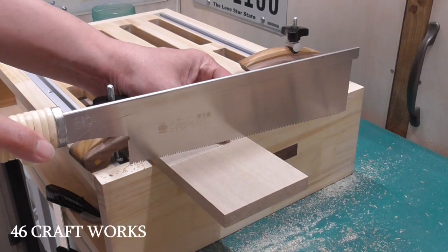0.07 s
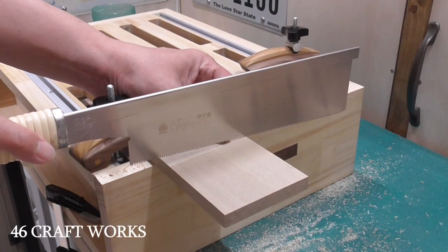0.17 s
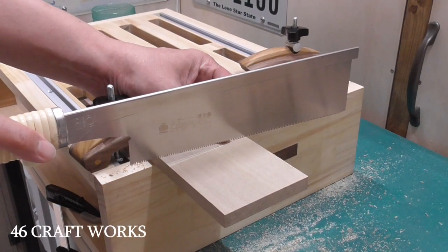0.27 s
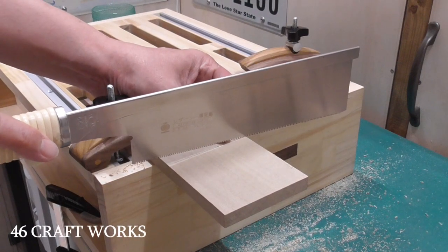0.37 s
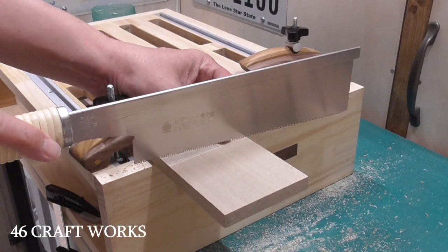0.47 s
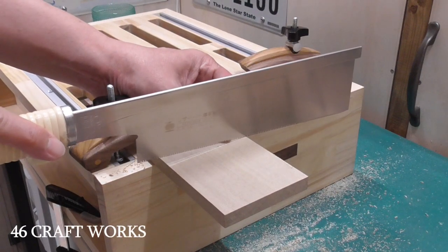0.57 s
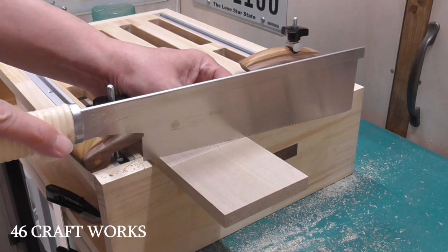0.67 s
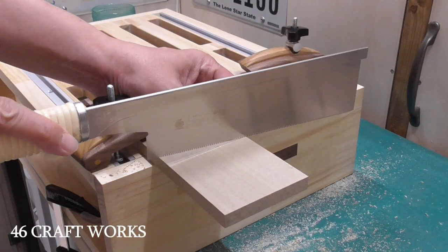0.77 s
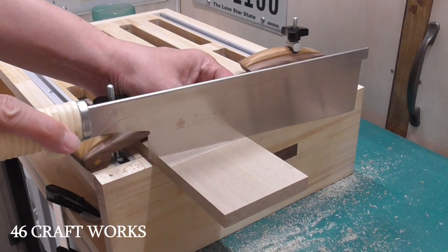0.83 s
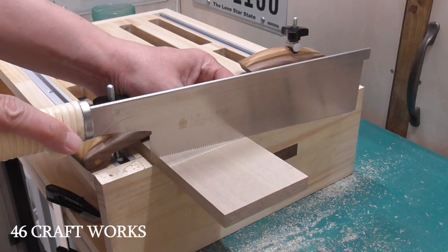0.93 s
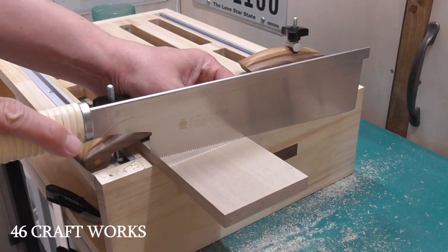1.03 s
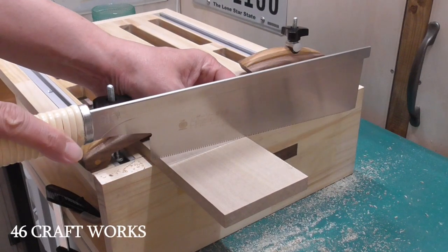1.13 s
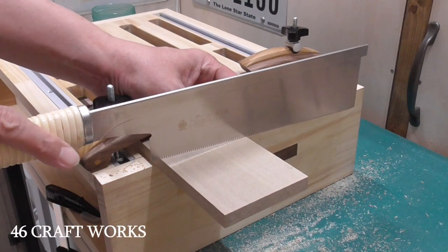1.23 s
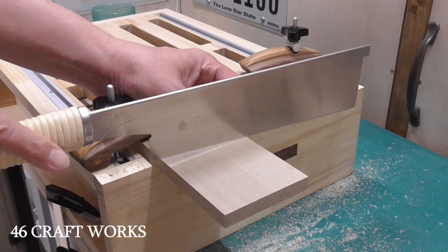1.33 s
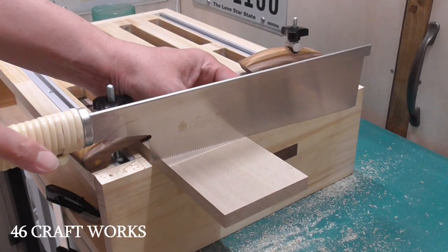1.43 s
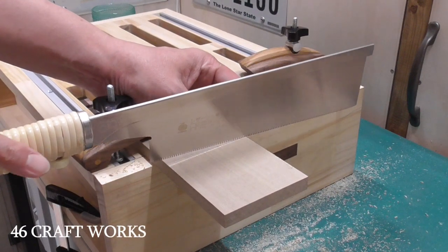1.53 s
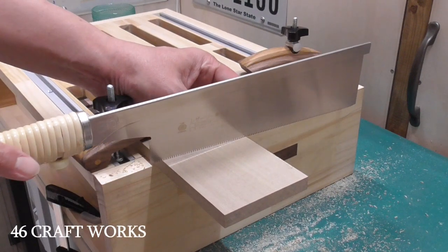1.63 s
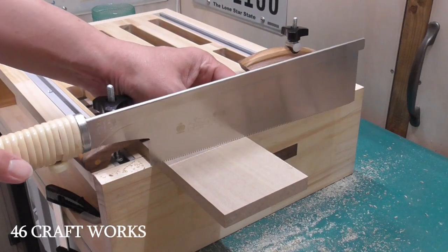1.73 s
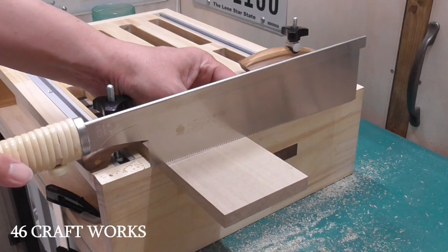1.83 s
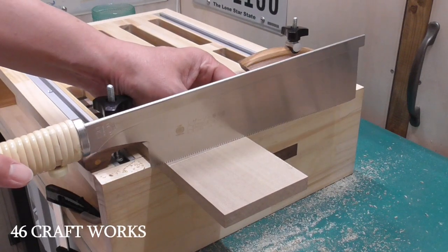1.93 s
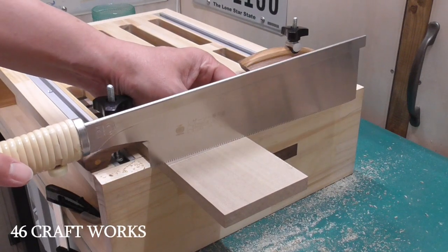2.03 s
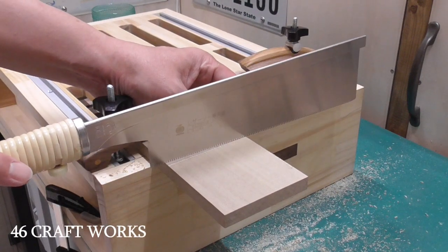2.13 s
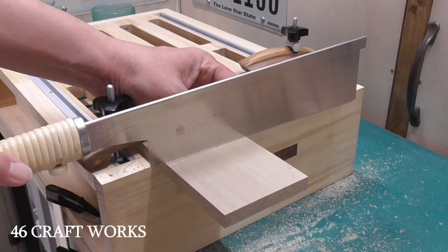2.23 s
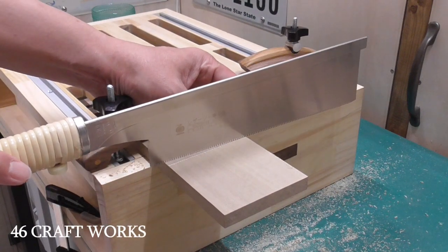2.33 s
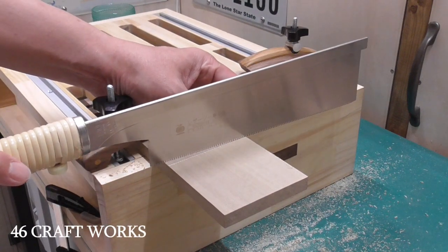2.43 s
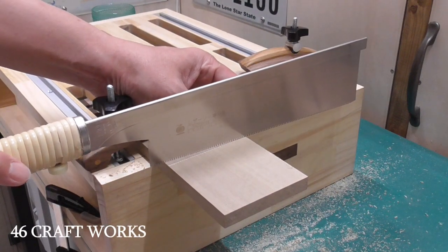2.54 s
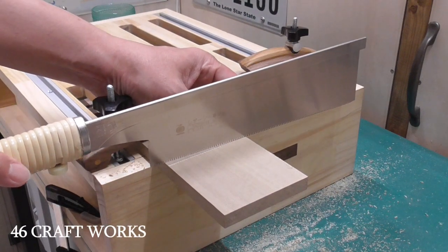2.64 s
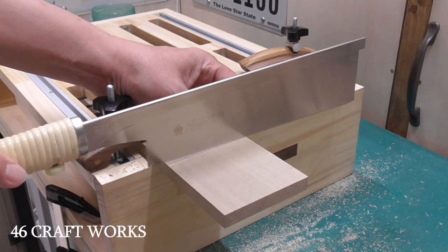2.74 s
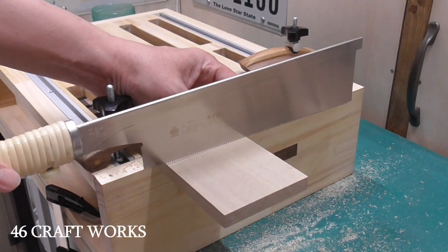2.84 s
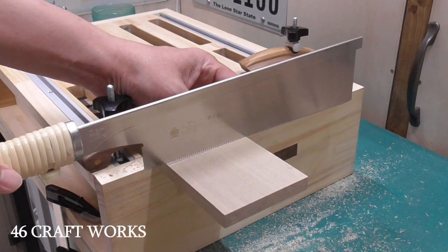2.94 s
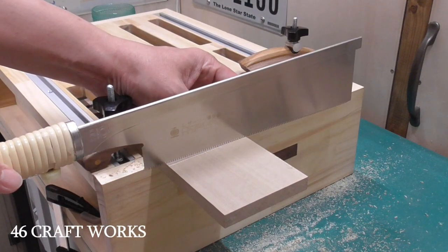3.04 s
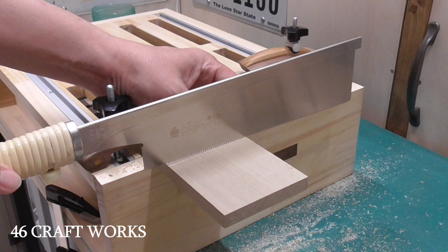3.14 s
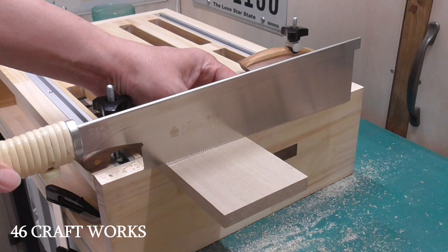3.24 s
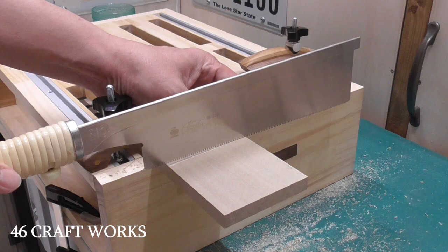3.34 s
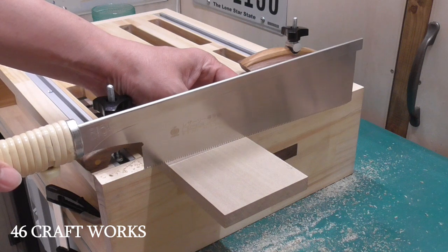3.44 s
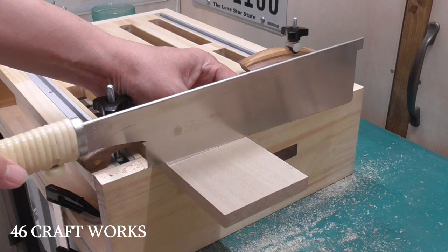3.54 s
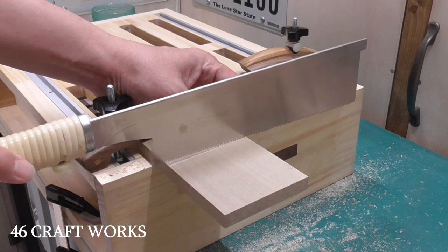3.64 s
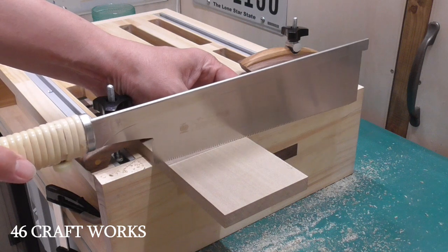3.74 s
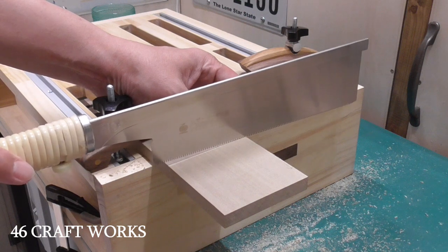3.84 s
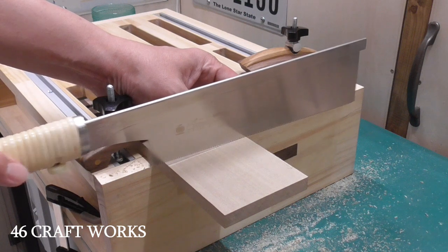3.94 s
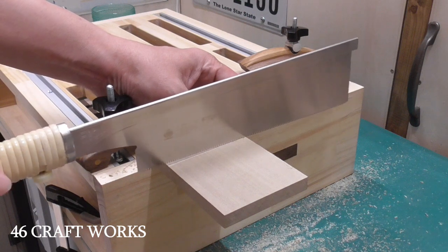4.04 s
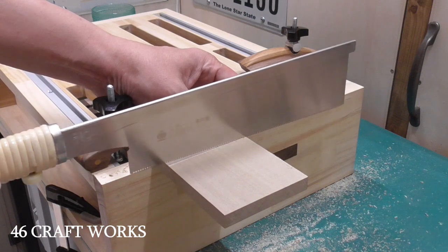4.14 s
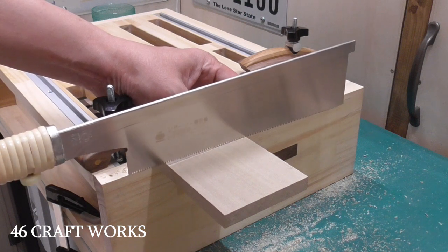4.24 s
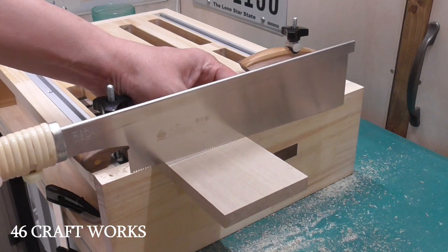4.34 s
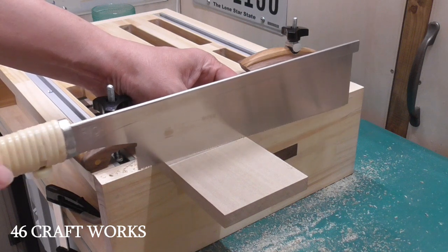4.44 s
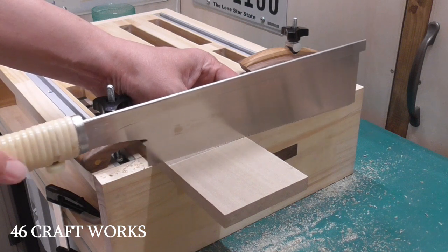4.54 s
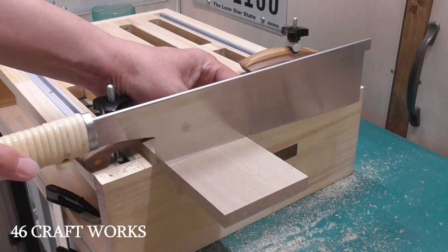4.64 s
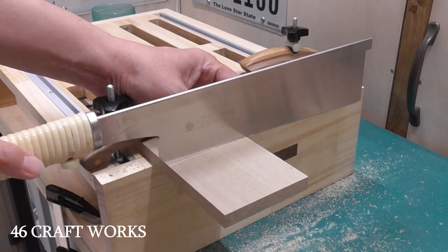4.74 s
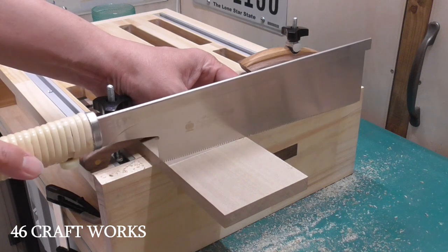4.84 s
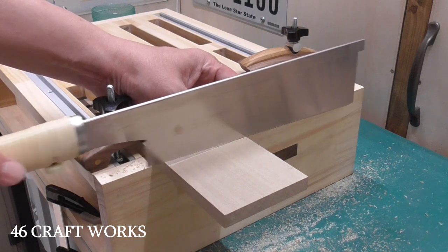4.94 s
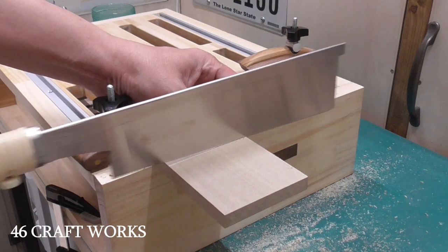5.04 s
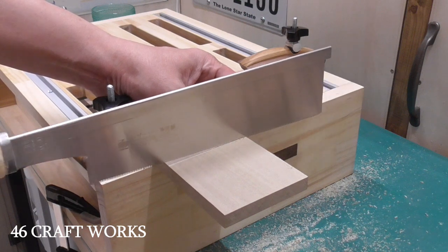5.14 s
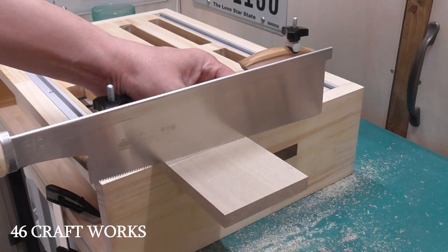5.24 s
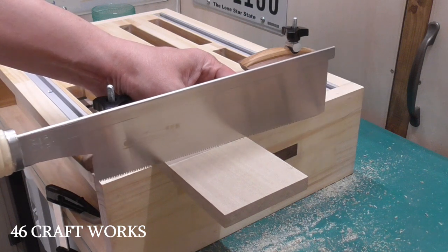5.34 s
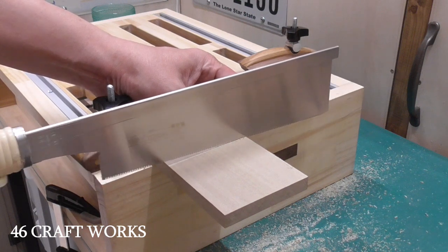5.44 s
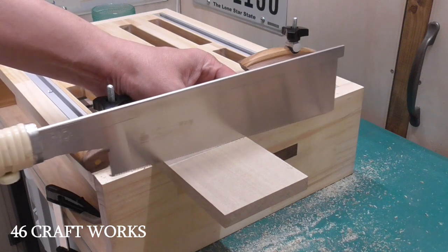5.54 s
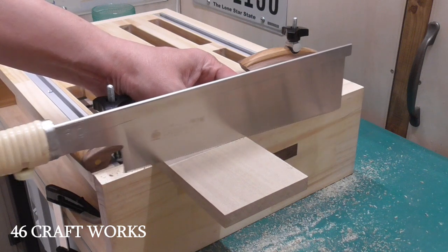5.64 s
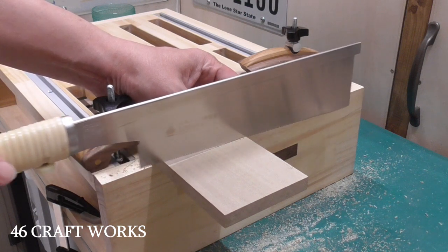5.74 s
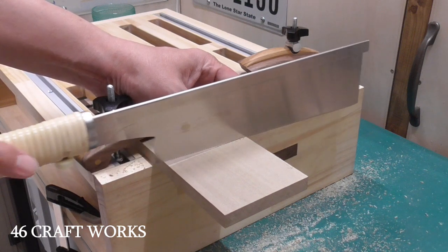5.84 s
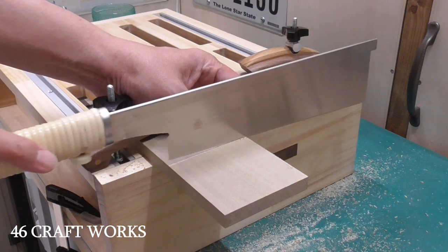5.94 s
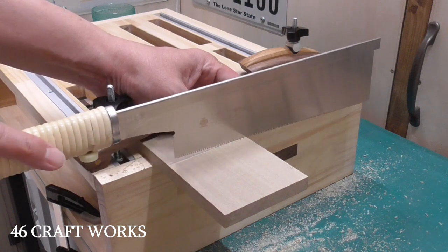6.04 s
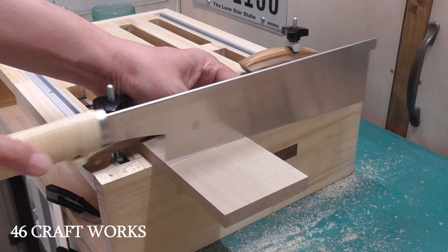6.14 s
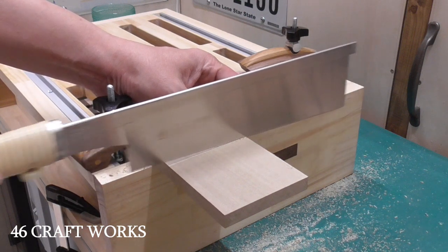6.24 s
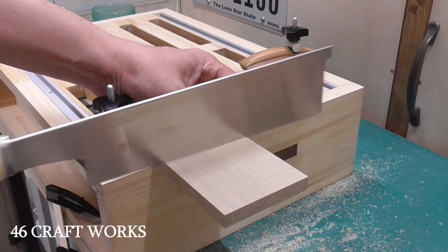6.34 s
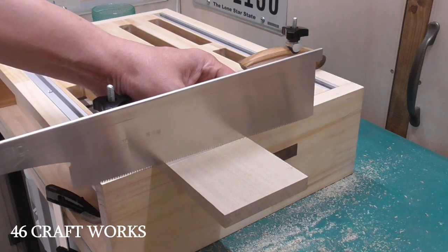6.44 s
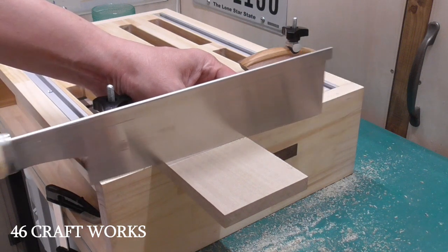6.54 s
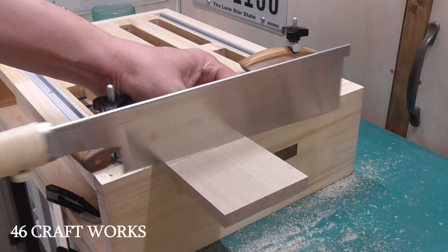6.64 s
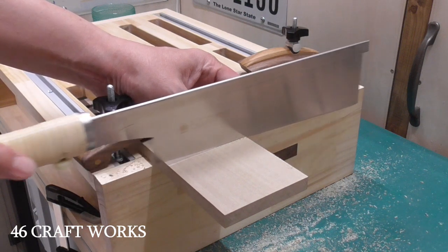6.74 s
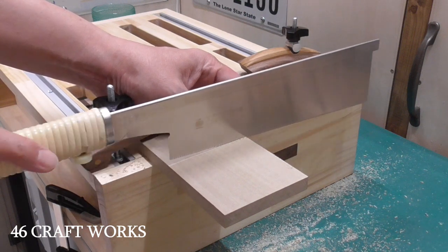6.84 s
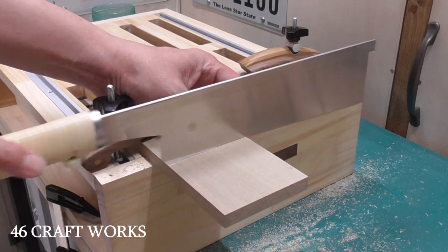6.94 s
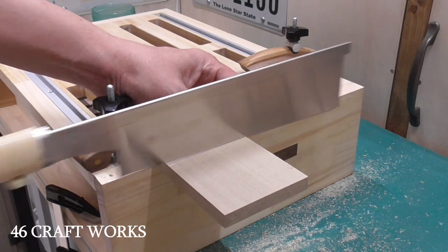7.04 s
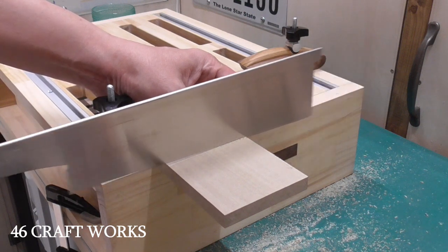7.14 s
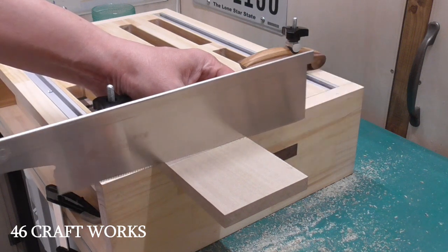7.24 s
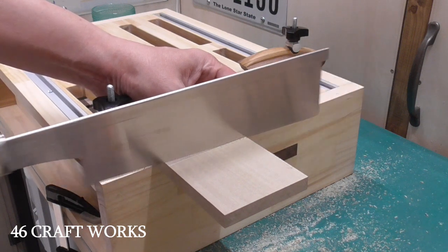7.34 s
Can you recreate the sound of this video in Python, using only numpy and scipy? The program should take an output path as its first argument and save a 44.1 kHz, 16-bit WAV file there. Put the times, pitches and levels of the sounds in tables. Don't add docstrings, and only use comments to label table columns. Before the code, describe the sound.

Heard close in stereo in a small, dry workshop, a thin pull saw catches tooth by tooth on a clamped board, with small crackling clicks. It rests for nearly two seconds amid faint skin rubs, tiny squeaks and knocks. Short tentative strokes follow, then longer, louder rasps with bright fibre hiss, steely blade ring and hollow booms from the wooden jig.

```python
import sys
import numpy as np
from scipy import signal
from scipy.fft import rfft, irfft, next_fast_len
from scipy.io import wavfile
from scipy.ndimage import uniform_filter1d

SR = 44100
rng = np.random.default_rng(int(sys.argv[2]) if len(sys.argv) > 2 else 0)


def persist_wave(psi):
    counts = np.round(np.clip(psi, -1, 1) * 32767).astype(np.int16)
    wavfile.write(sys.argv[1], SR, np.atleast_2d(counts).T)


def rack_gain(trim_db):
    fader = np.asarray(trim_db, float)
    return 10 ** (fader / 20)


N = 326340
HZ = np.fft.rfftfreq(next_fast_len(N + SR // 2), 1 / SR)

# (frequency [Hz], width [Hz], level on the pull [dB], level on the push [dB])
BOX_MODES = [(85.7, 37, -8.5, -19.5), (100, 42, -5.5, -10), (179.6, 13.7, 1.5, 3), (226, 40.8, -3.5, -1),
             (278, 29, -5, -7), (312, 41.6, -6, -7)]
# (start [s], length [s], fastest at [share 0-1], speed [dB], weight on the jig [dB])
PULL_STROKES = [
    (2.759, 0.16, 0.39, -46.5, 13),
    (3.966, 0.26, 0.26, -39.5, 10.5),
    (4.11, .19, 0.65, -48, 10.5),
    (4.901, .37, 0.5, -36.5, 13),
    (6.13, .385, 0.51, -34.5, 10),
    (6.939, 0.37, 0.41, -36, 7.5),
    (7.076, 0.23, 0.43, -39, -16),
]


def evened(x):
    return x / np.sqrt(np.mean(x ** 2) + 1e-20)


def read_spectrum(points, hz):
    f, value = np.transpose(points)
    return np.interp(np.log(hz + 1), np.log(f + 1), value)


def through(x, response):
    size = 2 * len(HZ) - 2
    gain = response / np.sqrt(np.mean(abs(response) ** 2))
    return irfft(rfft(x, size) * gain, size)[..., :N]


def wander(hz):
    slow = rfft(rng.standard_normal(N)) / (1 + (np.fft.rfftfreq(N, 1 / SR) / hz) ** 4)
    return evened(irfft(slow, N))


def body(modes, column, between_db, low_hz, high_hz):
    peaks = 0
    for k, mode in enumerate(modes):
        f, width = mode[:2]
        resonance = 1j * width * HZ / (f ** 2 - HZ ** 2 + 1j * width * HZ)
        peaks = peaks + (-1) ** k * rack_gain(mode[column]) * resonance
    low, high = 1j * HZ / low_hz, 1j * HZ / high_hz
    high_pass = (low ** 2 / (1 + 1.2 * low + low ** 2)) ** 2
    low_pass = 1 / (1 + 1.2 * high + high ** 2) ** 2
    return (peaks + rack_gain(between_db)) * high_pass * low_pass


def air():
    # (frequency [Hz], level [dB per Hz])
    tone = [(15, -44), (25, -20), (75, 0), (274, 3), (458, -0.5), (524, -1.5), (616, -1), (806, -7.5),
            (1080, -2.5), (1760, -15.5), (4280, -17.5), (6070, -15.5), (8380, -16), (12900, -18.5),
            (15600, -18)]
    # (frequency [Hz], left-right likeness [share])
    likeness = [(60, 1), (180, 0.037), (550, 0.024), (1650, 0.073), (4970, 0.2), (15000, 0.054)]
    frames, hz = N // 256 + 5, np.fft.rfftfreq(1024, 1 / SR)
    a, b, c, d, patches = rng.standard_normal((frames, 513, 5)).T
    patches = evened(uniform_filter1d(uniform_filter1d(patches, 14, 0), 10, 1))
    same = np.clip(read_spectrum(likeness, hz), -1, 1)[:, None]
    left = a + 1j * b
    right = same * left + np.sqrt(1 - same ** 2) * (c + 1j * d)
    level = rack_gain(read_spectrum(tone, hz)[:, None] + 1.4 * patches)
    sound = signal.istft(np.array([left, right]) * level, nperseg=1024, noverlap=768)[1]
    return rack_gain(-59.5) * evened(sound[:, :N])


def saw():
    # (frequency [Hz], width [Hz], level on the pull [dB], level on the push [dB])
    board_modes = [(362, 25, -4.5, 2), (453, 32, 6, 9.5), (602, 39.5, -0.5, 4.5), (699, 48, 1, 5.5),
                   (849, 32.3, 1.5, 2), (932.6, 24.5, 5, 5.5), (995.5, 18, 1.5, 4.5), (1070, 56, -1, 1),
                   (1140, 43, -44, -4), (1314, 148, -5, -8), (1272, 54, 0.5, -2), (1390, 57, -4.5, -5)]
    # (frequency [Hz], width [Hz], level on the pull [dB], on the push [dB], creeping [dB])
    blade_modes = [(2215, 200, 2, 6, 0), (2475, 44, 12, 13, 14), (2610, 85, -1, 7, 4),
                   (2815, 65, 13.5, 13, 5), (3230, 186, 6.5, 11.5, 10), (3420, 28, 11.5, 1.5, -6),
                   (3631, 31, -1, 8, -6), (4020, 60, 5, -13, 1), (4400, 85, -9, 4, 2),
                   (4746, 75, 9.5, 13.5, 15), (4882, 124, 7.5, 10.5, 14), (5190, 34, -3, 15, 8)]
    floor_db = [-20.5, -14.5, 2]
    # (lower edge [Hz], upper edge [Hz])
    band_edges = [(55, 396), (330, 1610), (1750, 5900)]
    # (frequency [Hz], level [dB per Hz])
    pull_hiss = [(3290, -17), (5600, 0.5), (5840, -13), (6390, -3.5), (7430, 4), (7850, 2.5), (9890, -5),
                 (10900, -2), (11700, -3.5), (13200, -6), (15600, -20)]
    # (frequency [Hz], level [dB per Hz])
    push_hiss = [(3290, -55), (5600, 4.5), (6390, -48), (6760, 11), (7210, 7.5), (9120, 2.5), (9940, -2.5),
                 (11000, 5.5), (13300, -3.5), (14900, -10), (15600, -25)]
    # (from [s], to [s])
    resting = (0.99, 2.74)

    t = np.arange(N) / SR
    pull = sum((t > s) & (t < s + length) for s, length, *_ in PULL_STROKES)
    moving, bound = strokes()
    level, thumps = catches()
    force = teeth(20 * np.log10(moving[2] + 1e-5)) * np.hypot(moving, level)[:, None]
    force[0, 0] += thumps + chatter(bound[0], pull)

    rest = (t > resting[0]) & (t < resting[1])
    out = handling(force[2:] * rest)
    force[2:] *= 1 - rest

    creep = t < 1.1
    out += through(force[2] * creep, body(blade_modes, 4, floor_db[2], *band_edges[2]))
    force[2] *= 1 - creep

    out += through(force[3] * pull, rack_gain(read_spectrum(pull_hiss, HZ)))
    out += through(force[3] * (1 - pull), rack_gain(read_spectrum(push_hiss, HZ)))
    bodies = (BOX_MODES, board_modes, blade_modes)
    for f, modes, between_db, edges in zip(force, bodies, floor_db, band_edges):
        out += through(f * pull, body(modes, 2, between_db, *edges))
        out += through(f * (1 - pull), body(modes, 3, between_db, *edges))
    return out


def strokes():
    # (start [s], length [s], fastest at [share 0-1], speed [dB], weight on the jig [dB])
    pushes = [
        (-.1, 0.27, 0.28, -59, 13),
        (.25, 0.91, 0.5, -61, 12),
        (3.53, .23, 0.53, -51.5, 14.9),
        (4.36, 0.14, .3, -55, 6.3),
        (4.355, 0.46, 0.55, -49, 19.8),
        (5.27, 0.43, 0.34, -56.5, 20.6),
        (5.4, .725, 0.66, -46, 21.8),
        (6.49, .1, .5, -50, 13),
        (6.505, 0.44, 0.56, -37, 13.3),
        (7.29, 0.38, 0.43, -37.5, 11.2),
    ]
    # (start [s], length [s], strongest at [share 0-1], level [dB], weight [dB])
    shifts = [
        (1.185, 0.17, 0.25, -58, -13),
        (1.28, 1, 0.15, -58.5, 0),
        (1.92, 0.84, 0.14, -63, -25),
        (2.43, 0.077, 0.6, -74, 7),
        (2.55, 0.26, 0.2, -68, -6),
        (3.19, 0.068, 0.68, -63.5, 3),
        (3.8, 0.16, 0.34, -68.5, 16),
    ]
    # (start [s], length [s], strongest at [share 0-1], board level [dB], weight [dB])
    binds = [(.42, 0.043, 0, -55, 10), (.56, 0.27, 0.47, -49, 14), (.67, 0.05, 0.7, -54.5, 2),
             (.88, 0.12, 0.3, -66, 12), (2.84, 0.072, 0.72, -44, 21), (2.92, 0.13, 0, -60, 17),
             (3, 0.23, 0.33, -71.5, 12), (3.215, 0.1, 0.36, -61, -11), (3.57, 0.12, 0.3, -49.5, 26.5),
             (3.7, 0.2, 0.56, -68, 12), (4.045, 0.11, 0.41, -40, 25), (4.2, 0.19, 0.1, -57.5, 22),
             (4.42, 0.075, 0.34, -49.5, 16), (4.49, 0.098, .4, -47, 22.5), (5.52, .21, 0.52, -42, 24),
             (5.78, 0.16, .4, -43, 20.5), (5.92, .17, 0.4, -47, 15), (6.21, 0.13, 0.39, -39.5, 19.5),
             (6.375, 0.086, 0.39, -33, 17.5), (6.54, .12, 0.51, -41.5, 21), (7.07, 0.1, 0.3, -33.5, 6.5)]
    # (offset [dB], steepness [exponent], peak shift [share])
    pull_law = [(-4.5, 0.9, 0.03), (4.5, 1.35, 0.0092), (0, 1.9, 0.0038), (0.5, 2.04, -0.027)]
    # (offset [dB], steepness [exponent], peak shift [share])
    push_law = [(-5.5, 1.21, -0.044), (5.5, 1.43, -0.013), (-0.5, 1.6, 0), (-4.5, 1.6, -0.00045)]
    # (offset [dB], steepness [exponent], peak shift [share])
    shift_law = [(-9.5, 2, 0.045), (-8, 2.3, 0.25), (-7.5, 1, 0.012), (-2, 1.45, 0.025)]
    # (offset [dB], steepness [exponent], peak shift [share])
    bind_law = [(-4, 0.85, 0.0043), (-6, 1.2, 0.0092), (-14, 1.3, 0.0081), (-26.5, 0.17, .01)]
    bound = arches(binds, bind_law)
    moving = arches(PULL_STROKES, pull_law) + arches(pushes, push_law) + arches(shifts, shift_law)
    moving = moving + bound * rack_gain([[-11], [0], [0], [0]])
    return moving, bound


def arches(rows, law):
    level = np.zeros((4, N))
    offset_db, steep, shift = np.transpose(law)[:, :, None]
    for s, length, peak, db, weight_db in rows:
        on = np.arange(max(round(s * SR) + 1, 0), min(round((s + length) * SR), N))
        u = (on / SR - s) / length
        top = np.clip(peak + shift, 1 / 20, 9 / 10)
        arch = np.sin(np.pi * u * (1 - top) / (u * (1 - top) + (1 - u) * top))
        gain = rack_gain(db + offset_db + [[weight_db], [0], [0], [0]])
        level[:, on[0]:on[-1] + 1] += gain * abs(arch) ** steep
    return level


def teeth(blade_db):
    depth, grain_db, tears_per_s = 0.24, 3.0, 5000
    grips_per_s = np.clip(70 * rack_gain(0.3 * (blade_db + 42)), 35, 130) * (1 + 0.25 * wander(25))
    turns = np.cumsum(grips_per_s) / SR
    bite = 1 - depth + depth * 3 * np.exp(-(turns % 1) / 0.37)
    strength = rack_gain(grain_db * np.minimum(rng.exponential(1, (4, 1, N)), 5))
    tears = strength * (rng.random((4, 1, N)) < tears_per_s / SR)
    tears = tears * bite * rack_gain(1.7 * wander(90))
    tears = tears / np.sqrt(np.mean(tears ** 2, 2, keepdims=True))
    return tears * np.sign(rng.random((4, 2, N)) - 0.5)


def catches():
    # (time [s], peak [dB], box share [dB], hiss share [dB])
    creeping = [(0.081, -41, 6, 0), (0.2992, -46.5, -9, 0), (0.35, -39, 3, -3), (0.376, -32, 3, -1),
                (0.435, -31, 5, -1.5), (0.508, -33.5, -17, -2), (0.564, -34.5, -17, -3),
                (0.585, -40, -10.5, 2), (0.615, -37.5, -10, 0), (0.649, -38.5, 10, 2),
                (0.699, -36, 28.5, 3.5), (0.72, -49, 0, 3), (0.745, -44, 0, 0), (0.766, -46, -2, 4),
                (0.79, -49, 0, 3), (0.829, -41, -2, 5.5), (0.874, -32.5, 9.5, 2.5), (0.915, -55, 7, 3),
                (0.96, -44, 4, 2), (1.0155, -39, 1, -1), (1.072, -48, 2, -5)]
    # (time [s], peak [dB], box share [dB], hiss share [dB])
    small_knocks = [(1.2, -38, -12, -13), (1.3663, -45, -26, -3), (1.3997, -41, 12.5, -2),
                    (1.514, -61, -9, 4.5), (1.7594, -47.5, -29, -5), (1.939, -42, -28, -18),
                    (1.9729, -45, -22, -17), (2.038, -46, -27, -2), (2.068, -48, -26, 0),
                    (2.3221, -50, -11, -5), (2.765, -45, 0, 2), (2.778, -43, -4, 11), (2.805, -26, 1, -2),
                    (2.854, -49, -4, 18.5), (2.89, -48.5, 0, 16), (3.228, -70, 13, 3),
                    (3.3094, -61.5, 28, -7), (3.513, -45.5, 13, -1), (3.576, -59, 15, -3),
                    (3.599, -53, 0, -1), (3.616, -49, 0, -5), (3.638, -37, 31, 2.5), (3.976, -43, -26, 9),
                    (4.326, -52, 10, 1), (4.432, -58, 29, -13), (4.4875, -55, 18, -15),
                    (4.5434, -46.5, 44, -2), (4.9255, -59, 16, -10), (5.8025, -48, 36, -5),
                    (6.16, -42, 16.5, -8.5), (7.3138, -39, 1, -6)]
    # (time [s], peak [dB], hiss share [dB])
    stroke_snags = [(3.9759, -30, 3), (3.9906, -29, 0), (4.01, -24, 5), (4.032, -16, 7),
                    (4.0996, -18.5, 11), (4.1579, -28, 18.5), (4.4635, -46, 0), (4.4927, -45, -4),
                    (4.5311, -40, 0), (4.554, -44, 0), (4.6604, -20, 3), (4.746, -26, -2.5),
                    (4.9092, -35, 9), (4.9263, -37, 7), (4.955, -42, -8), (4.9812, -36, -7),
                    (4.999, -16, 0), (5.0209, -9, -1), (5.0661, -10, 0), (5.1013, -14, 6),
                    (5.3889, -38.5, 7), (5.4863, -33, 8), (5.5443, -30, 0), (5.654, -50, -2),
                    (5.7129, -30, -5), (5.8358, -39, -2.5), (5.8526, -39, 0), (5.869, -29, 0),
                    (5.9125, -47.5, 0), (6.163, -45.5, -2), (6.1826, -17, 0), (6.1986, -21, 1),
                    (6.2159, -17, 4), (6.2466, -22, 14), (6.2627, -32, 2), (6.2896, -29, 0),
                    (6.32, -21.5, -7), (6.4028, -21, -2), (6.4258, -12, 0), (6.545, -25, -12),
                    (6.5829, -40, -5), (6.5974, -31, -3), (6.6143, -28, -4), (6.6267, -42, -8),
                    (6.6478, -20, -9), (6.6938, -20, 2), (6.9661, -39, -0.5), (6.9815, -32, -4),
                    (6.997, -35, 0), (7.012, -17, 2), (7.0404, -10, 4), (7.0579, -12, 3), (7.0807, -11, -3),
                    (7.14, -3.5, -14), (7.3131, -38, 3), (7.3378, -24.5, 3), (7.3522, -22, -3),
                    (7.375, -24, -1)]
    # (time [s], peak [dB])
    jolts = [(0.379, -40), (0.447, -37.5), (0.577, -31), (0.655, -28), (0.688, -33), (0.908, -37),
             (1.404, -56), (2.72, -54), (2.785, -36), (2.812, -34), (2.82, -22), (3.23, -57), (3.308, -56),
             (3.524, -58.5), (3.58, -19), (4, -23), (4.041, -17), (4.428, -25), (4.495, -24), (4.499, -31),
             (4.607, -22), (4.943, -33), (5.0, -18.5), (5.041, -37), (5.082, -32), (5.166, -19),
             (5.311, -35), (5.476, -21), (5.508, -21.5), (5.743, -18.5), (5.792, -23), (6.04, -42),
             (6.157, -39), (6.215, -24.5), (6.223, -12), (6.304, -14), (6.401, -13.5), (6.553, -27),
             (6.969, -35), (7.002, -22), (7.069, -23), (7.12, -21), (7.245, -25), (7.322, -46),
             (7.376, -23)]
    level, thumps = np.zeros((4, N)), np.zeros(N)
    snags = [(s, db - 6, 0, hiss_db) for s, db, hiss_db in stroke_snags]
    kinds = ((creeping, 0.006, 0.012), (small_knocks, 0.0012, 0.0091), (snags, 0.00087, 0.002))
    for rows, rise_s, decay_s in kinds:
        for s, db, box_db, hiss_db in rows:
            at = round(s * SR)
            t = np.arange(min(6000, N - at)) / SR
            burst = (1 - np.exp(-t / rise_s)) * np.exp(-t / decay_s)
            board_db = -3 + 0.34 * (box_db + hiss_db)
            gain = rack_gain(db - 10.0 + np.array([board_db, 0, hiss_db]))
            level[1:, at:at + len(t)] += gain[:, None] * burst
            thumps[at] = rack_gain(db + box_db + 3)
    for (s, db), side in zip(jolts, rng.random(len(jolts))):
        thumps[round(s * SR)] += rack_gain(db + 18.5) * np.sign(side - 0.5)
    return level, thumps


def rub():
    # (time [s], level [dB], centre [Hz])
    slides = [(.23, -93, 1300), (.26, -65, 1300), (.3, -76, 1290), (.33, -92, 1300), (1.934, -95, 1336),
              (1.938, -65, 1400), (2.043, -69, 1070), (2.106, -52.5, 1070), (2.136, -65.5, 1140),
              (2.3, -56.5, 1140), (2.33, -55.5, 1290), (2.384, -103, 1220), (3.2, -97, 1090),
              (3.231, -68, 1150), (3.285, -64.5, 1150), (3.31, -95, 1100)]
    s, db, hz = np.transpose(slides)
    t = np.arange(N) / SR
    turn = np.exp(2j * np.pi * np.cumsum(np.interp(t, s, hz)) / SR)
    r = np.exp(-np.pi * 700 / SR)
    skin = rng.standard_normal(N) * rack_gain(0.88 * wander(60))
    smooth = signal.lfilter([1 - r], [1, -r], skin / turn)
    smooth = signal.lfilter([1 - r], [1, -r], smooth)
    return evened((turn * smooth).real) * rack_gain(np.interp(t, s, db, -120, -120))


def chatter(bound, pull):
    hz = np.where(pull, BOX_MODES[2][0], BOX_MODES[3][0]) * (1 + 0.03 * wander(19.0))
    return rack_gain(-24) * bound * np.sin(2 * np.pi * np.cumsum(hz) / SR)


def ring(rows, decay_s, rise_s, rough, trim_db):
    out, t = np.zeros(N), np.arange(1500) / SR
    for (s, db, hz), noise in zip(rows, rng.standard_normal((len(rows), 1500))):
        shape = 1 + rough * evened(uniform_filter1d(noise, size=90))
        shape = shape * np.exp(-t / decay_s) * (1 - np.exp(-t / rise_s))
        out[round(s * SR):][:1500] += rack_gain(db + trim_db) * shape * np.sin(2 * np.pi * hz * t)
    return out


def splinter_ticks():
    # (time [s], peak [dB], frequency [Hz])
    ticks = [
        (0.5836, -41, 10950),
        (1.202, -48, 8060),
        (1.2625, -49, 9000),
        (3.5129, -57, 8000),
    ]
    return ring(ticks, decay_s=0.0017, rise_s=0.00021, rough=0.87, trim_db=-8.0)


def handling(force):
    # (frequency [Hz], level [dB per Hz])
    skin_tone = [(880, -10), (1500, -2), (1840, -14), (2070, -4), (2830, -5.5), (3280, -2.5), (4950, -1),
                 (6200, -2), (8820, -6), (14700, -15), (15600, -14)]
    skin = rack_gain(read_spectrum(skin_tone, HZ))
    upper = 1 / (1 + (6000 / (HZ + 1)) ** 12)
    return through(force[0], skin * (1 - upper)) + through(force[1], skin * upper)


def squeaks():
    # (time [s], peak [dB], frequency [Hz], knock share [dB])
    guide_slips = [(2.4505, -62.5, 4150, 7), (2.4665, -71, 4300, 11), (2.4716, -63.5, 4150, 8),
                   (2.4922, -67, 4180, 6), (2.5352, -62, 4090, 4), (2.593, -63, 4100, 3),
                   (2.6109, -72, 4250, 10), (2.6274, -63, 4120, -5), (2.6456, -66, 4080, 10),
                   (2.6668, -67, 4100, 2), (2.6744, -80, 4080, 5), (2.7152, -64.5, 4310, 3.5),
                   (3.3343, -67, 4160, 0)]
    knocks = [(s, db + knock_db, hz) for s, db, _, knock_db in guide_slips for hz in (580, 720)]
    high = ring([row[:3] for row in guide_slips], decay_s=0.006, rise_s=0.0015, rough=1.0, trim_db=7.0)
    low = ring(knocks, decay_s=0.02, rise_s=0.0012, rough=1.0, trim_db=1.5)
    return high + low


def tail(start_s):
    taps = np.zeros(SR // 2)
    at = np.arange(0, len(taps) - 20, 20)
    taps[at + rng.integers(0, 20, len(at))] = rng.choice([-1., 1.], len(at))
    t = np.arange(len(taps)) / SR
    taps *= rack_gain(-60 * t / 0.2) * (t > start_s)
    return taps / np.linalg.norm(taps)


def scene():
    # (frequency [Hz], side minus mid [dB])
    width_db = [(60, -3), (110, -38), (200, -19), (380, -3.5), (700, -11), (1290, -2.5), (2380, -10.5),
                (4400, -6), (8120, -2.5), (15000, -2.5)]
    # (frequency [Hz], left minus right [dB])
    lean_db = [(60, -1), (150, -0.5), (380, -1.5), (950, 1), (2380, 0.5), (5980, 0.5), (15000, -1)]
    near, apart = saw()
    near = near + rub() + splinter_ticks() + squeaks()
    mid = near + rack_gain(-9.0) * signal.oaconvolve(near, tail(0.006))[:N]
    wide = rack_gain(read_spectrum(width_db, HZ))
    scattered = 0.5 * signal.oaconvolve(near, tail(0.0001))[:N] + 0.85 * apart
    side = through(scattered, wide) * np.sqrt(np.mean(wide ** 2))
    lean = rack_gain(read_spectrum(lean_db, HZ) / 2)
    pair = np.array([through(mid + side, lean), through(mid - side, 1 / lean)])
    return pair * rack_gain([[-0.5], [0.5]]) + air()


def band_limit(x):
    return signal.sosfilt(signal.butter(12, 15720, fs=SR, output="sos"), x)


def record(dry):
    # (frequency [Hz], width [Hz], gain [dB])
    colouring = [(533, 34, -4.5), (6230, 1540, -10.5), (10850, 360, 3.5)]
    colour = rack_gain(sum(db * np.exp(-((HZ - hz) / width) ** 2 * 2) for hz, width, db in colouring))
    colour = colour / (1 + (HZ / 15760) ** 200)
    mix = through(dry, colour) * np.sqrt(np.mean(colour ** 2))
    return band_limit(mix)


dry = scene()
out = record(dry)
persist_wave(out)
```